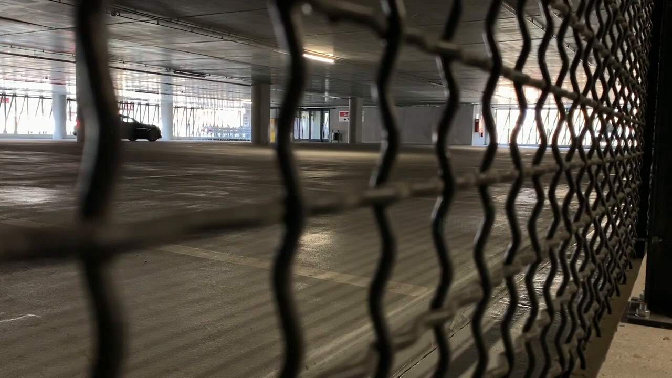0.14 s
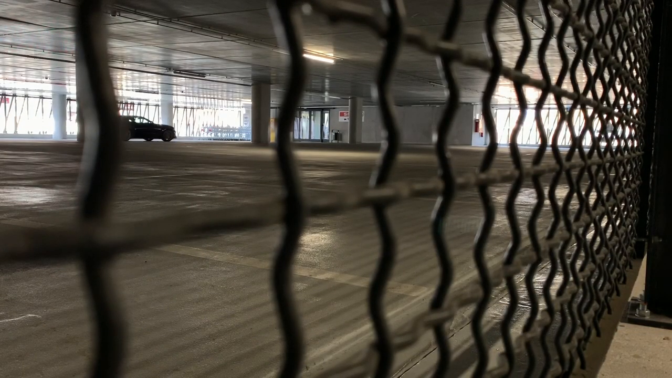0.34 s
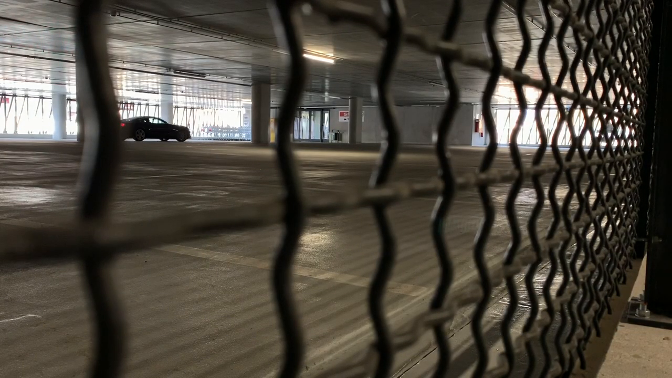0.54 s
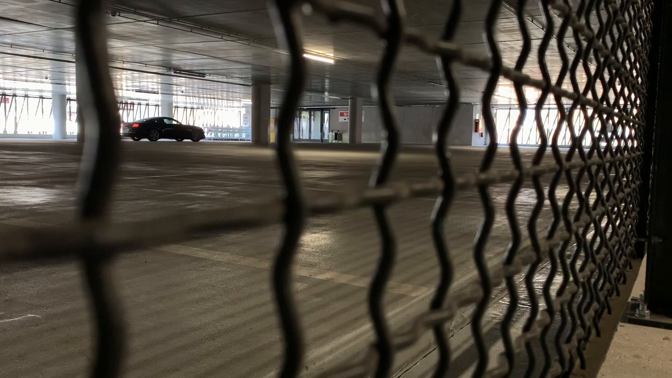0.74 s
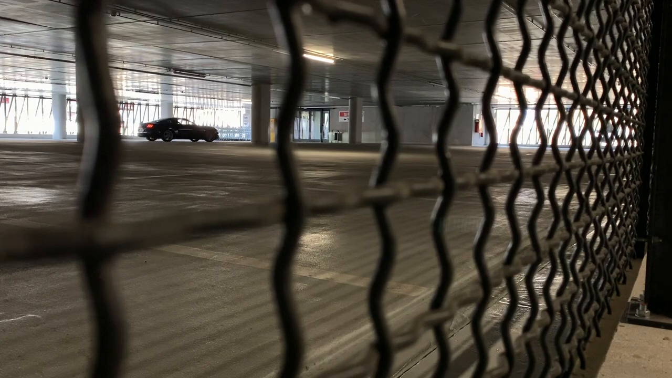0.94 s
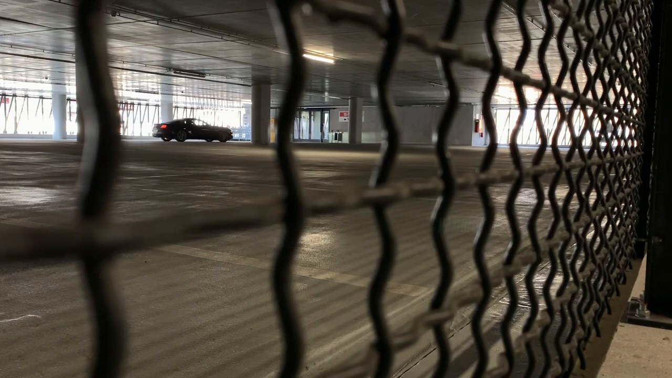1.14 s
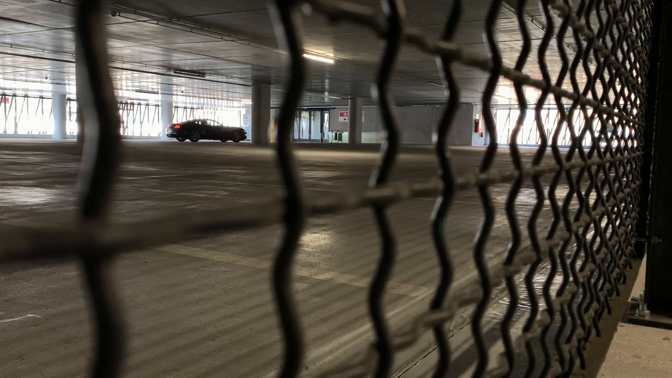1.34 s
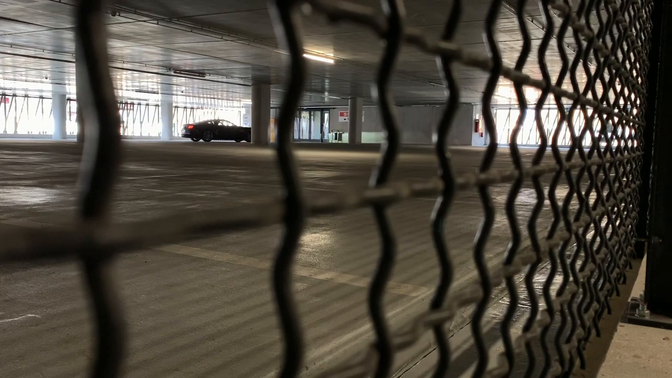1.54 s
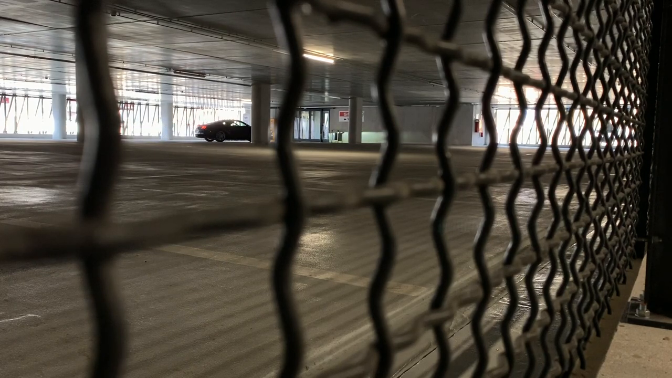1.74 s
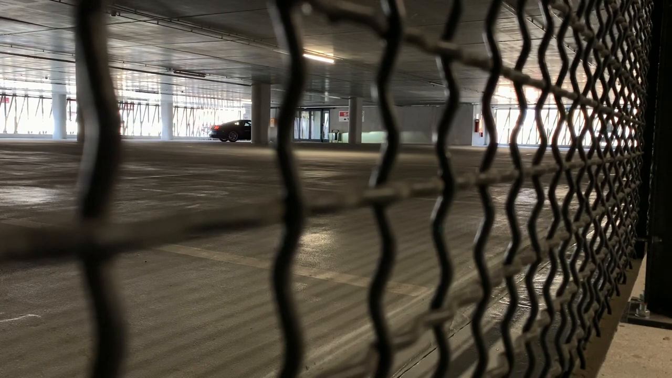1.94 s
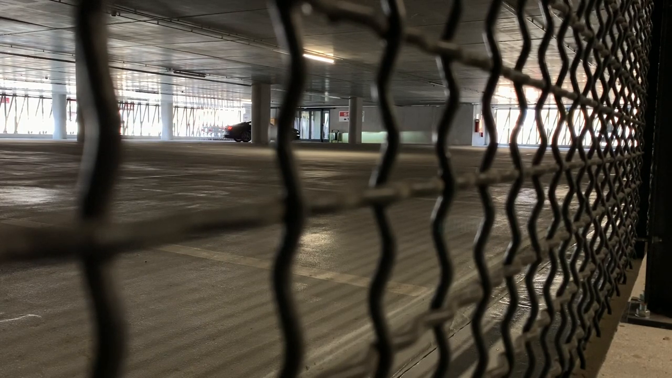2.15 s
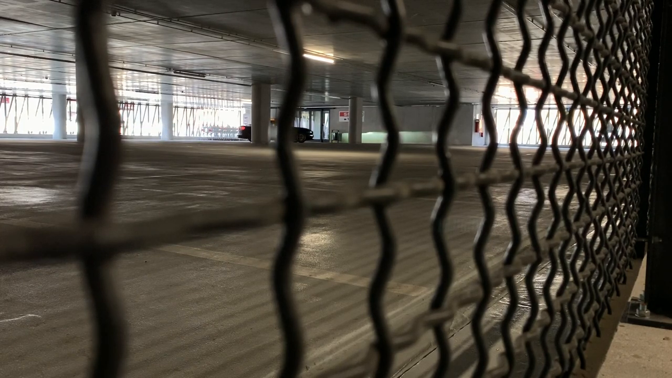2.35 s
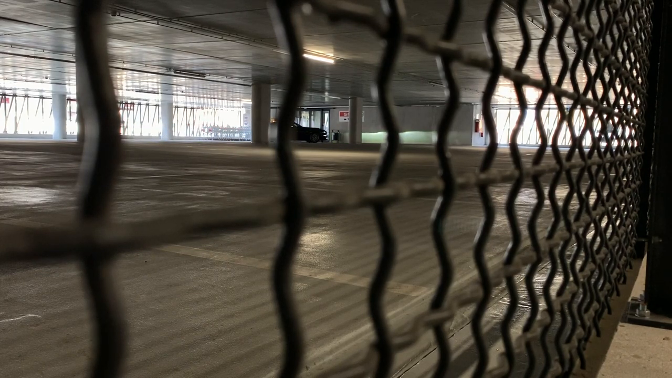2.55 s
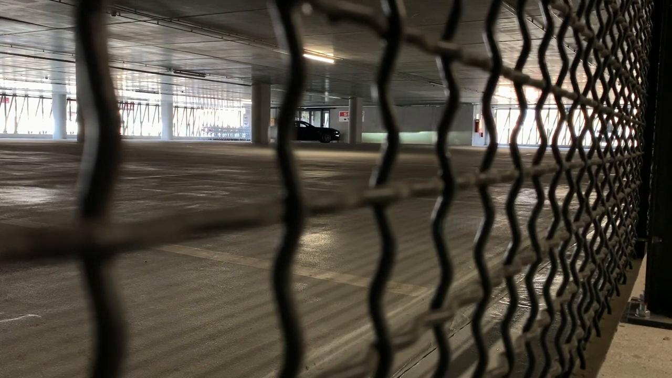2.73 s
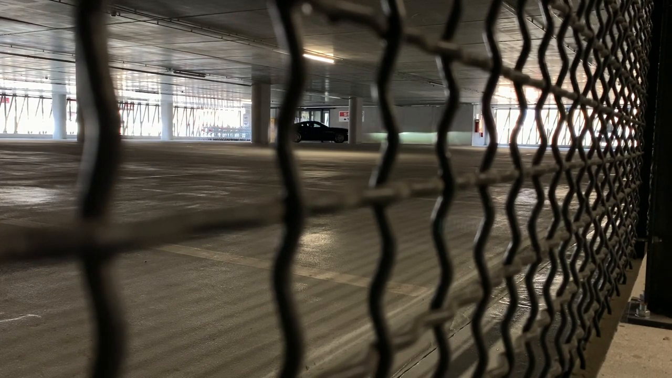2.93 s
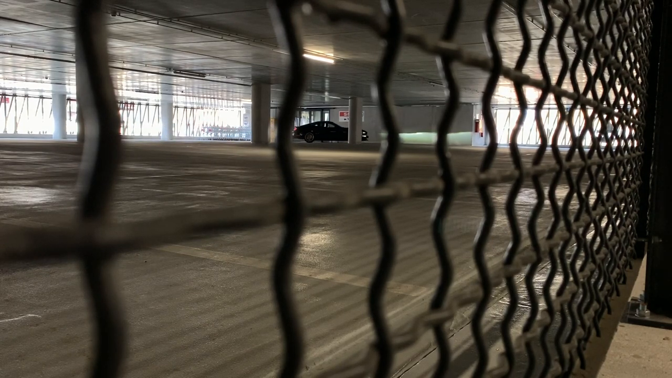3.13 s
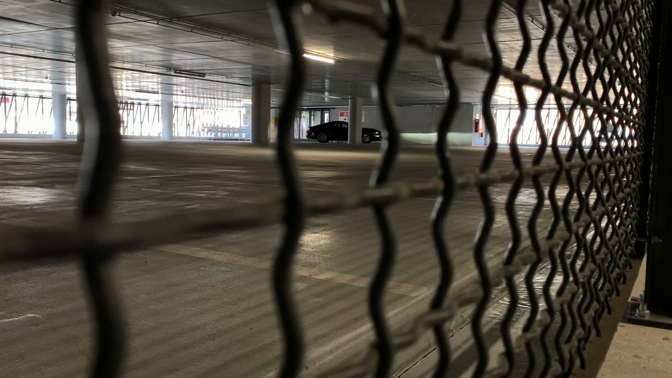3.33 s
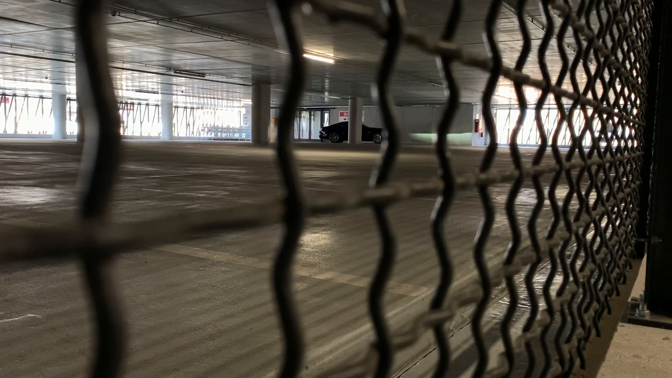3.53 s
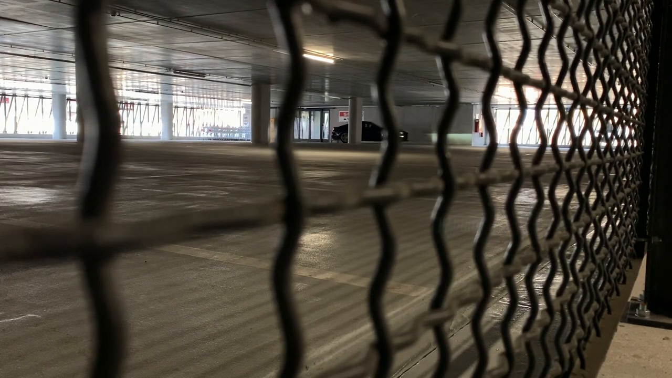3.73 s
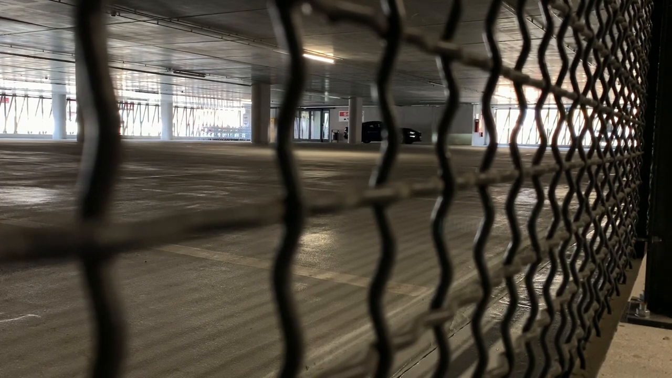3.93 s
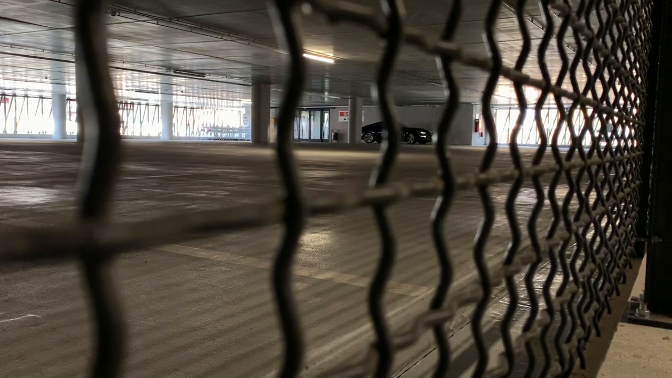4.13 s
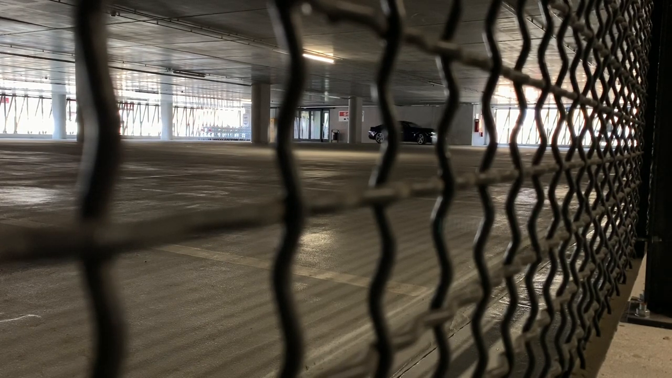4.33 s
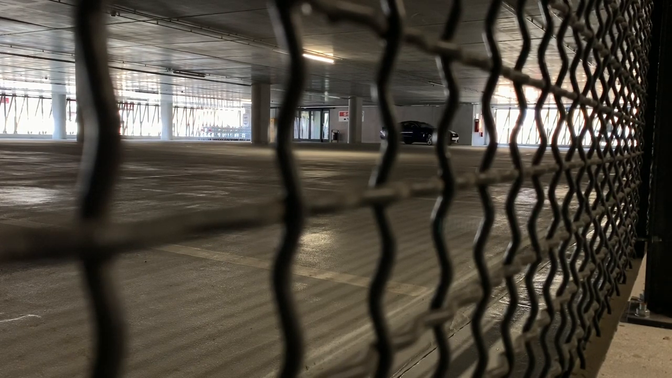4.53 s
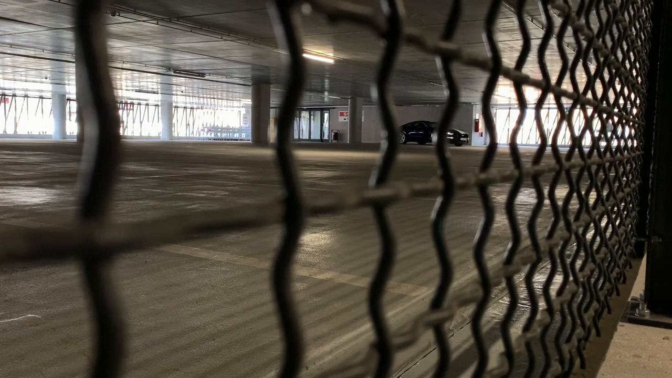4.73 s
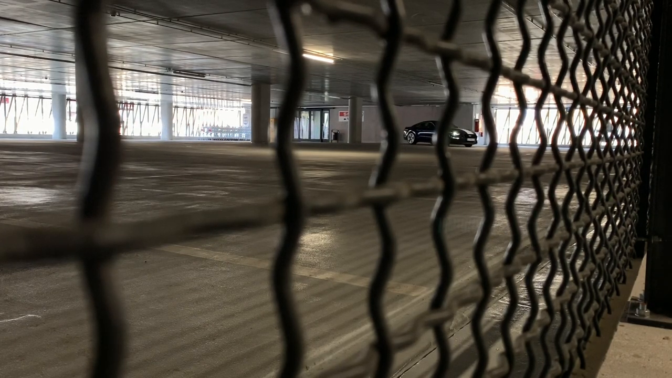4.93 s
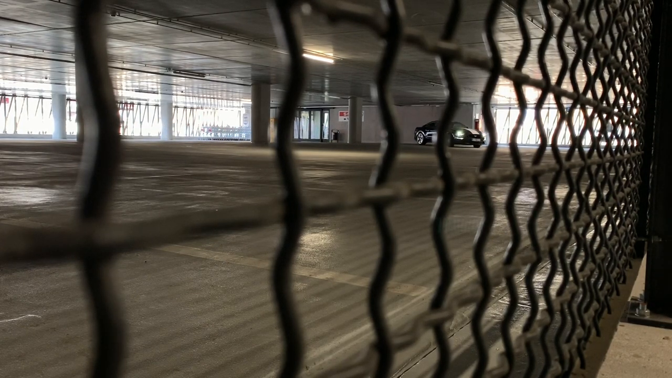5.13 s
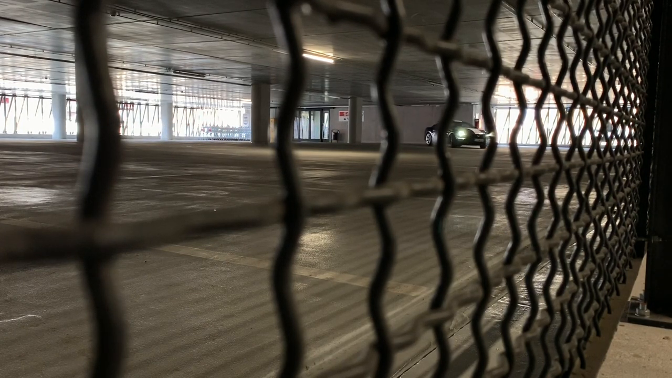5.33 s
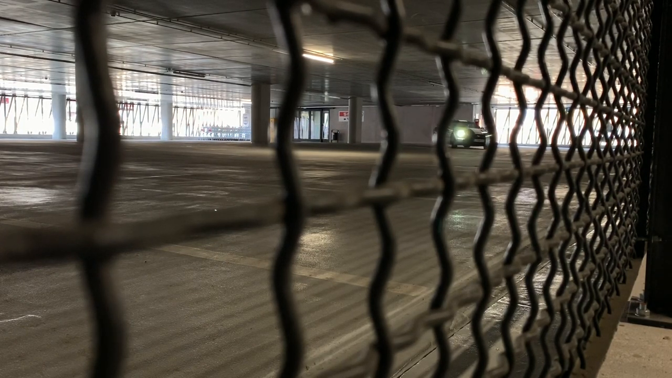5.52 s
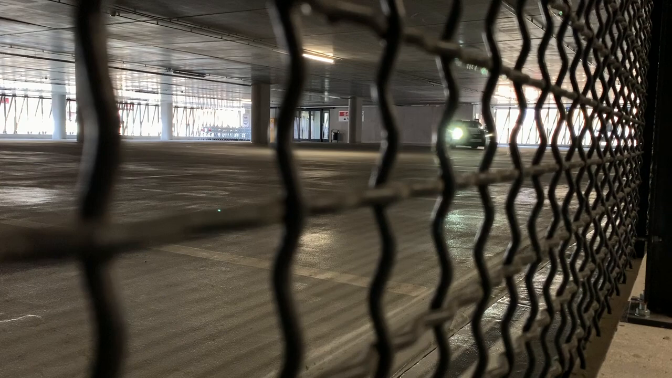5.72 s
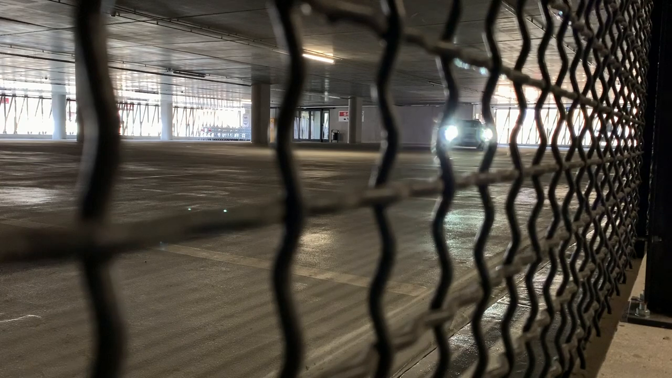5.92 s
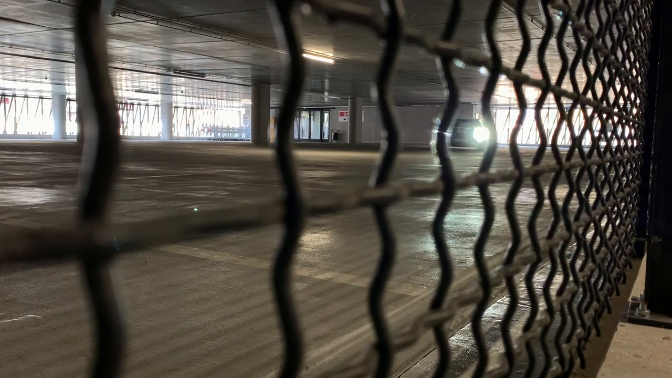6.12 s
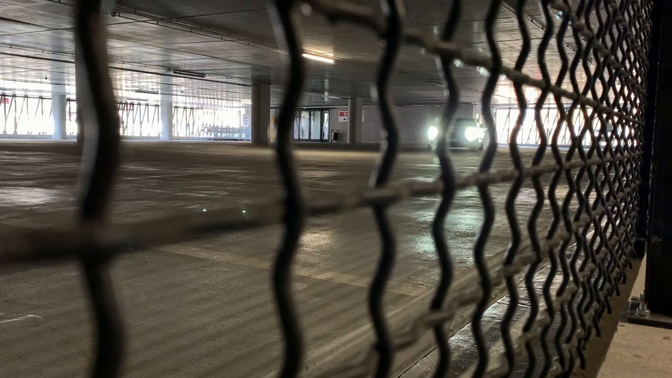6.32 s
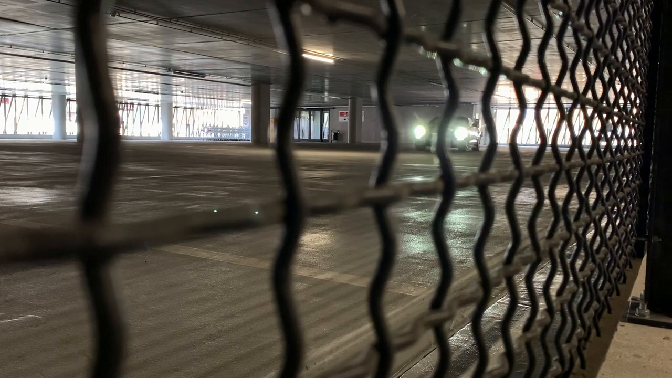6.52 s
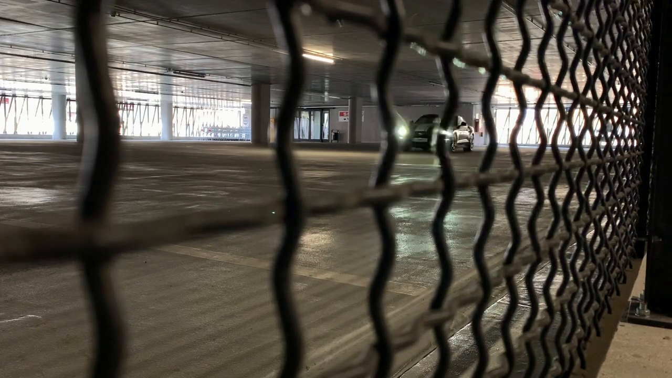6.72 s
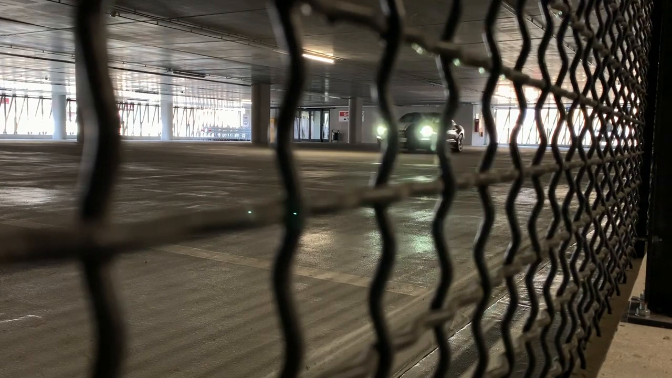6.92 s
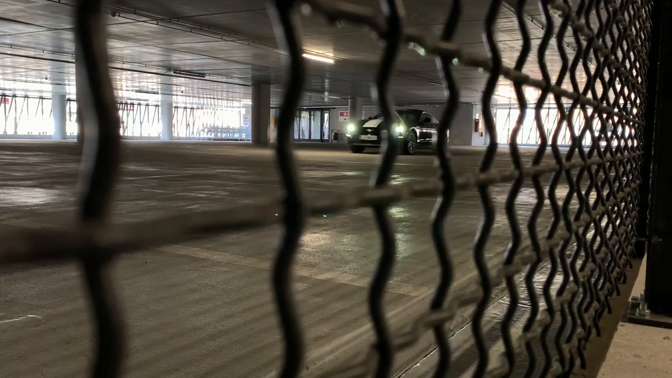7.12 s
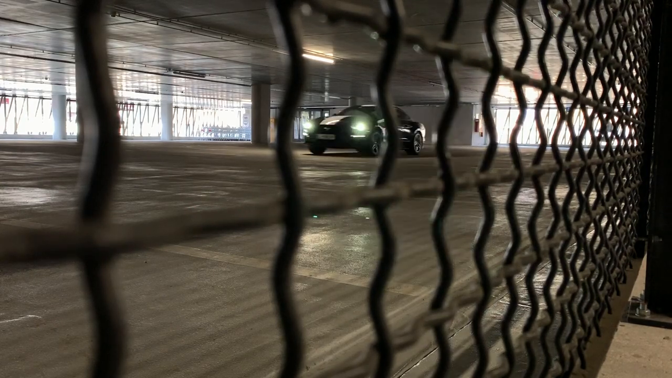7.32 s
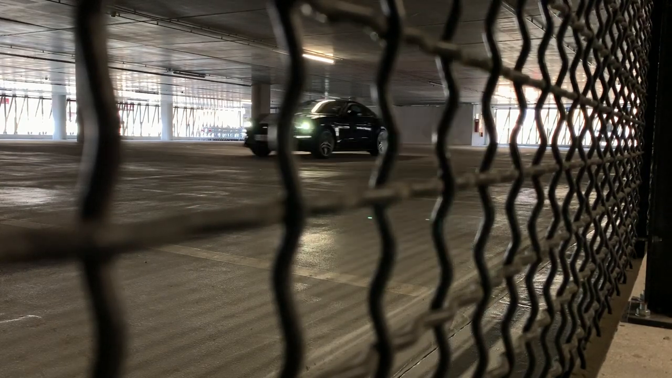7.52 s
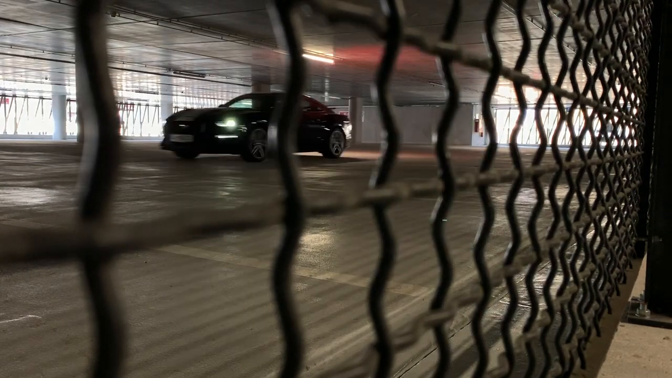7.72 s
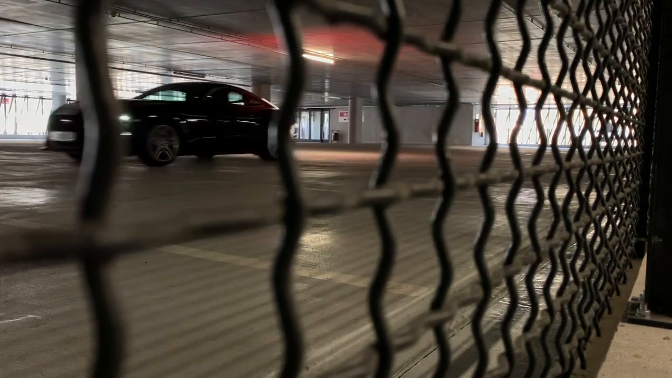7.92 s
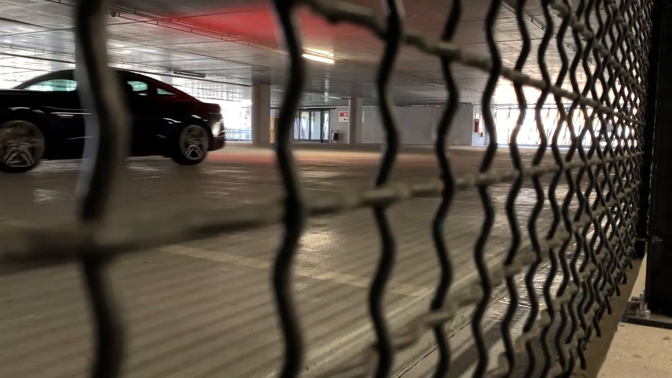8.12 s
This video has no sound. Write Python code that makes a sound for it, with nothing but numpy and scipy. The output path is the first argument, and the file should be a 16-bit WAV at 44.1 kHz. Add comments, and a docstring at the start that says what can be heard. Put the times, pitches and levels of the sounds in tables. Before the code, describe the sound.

Deep, uneven V8 exhaust booms through a parking garage as a car crawls along, turns and revs hard towards the listener.

```python
"""A V8 car crawls across the far end of a concrete parking garage, turns and accelerates towards us.
Uneven exhaust pulses ring the pipes, so they boom, burble and thud; gas rasps out with every firing,
and the bare decks smear it all into a roar. The tyres squeal thinly on the smooth floor as the
throttle first opens, and scrub through the turns. A thin, very high hiss grows as the car nears.
Under it all lies the building's rumble."""
import sys
import numpy as np
from scipy import signal
from scipy.fft import rfft, irfft
from scipy.io import wavfile
from scipy.ndimage import uniform_filter1d, minimum_filter1d

SR = 44100
rng = np.random.default_rng(int(sys.argv[2]) if len(sys.argv) > 2 else 0)


def generate_wav(signal):
    """Clip the signal to [-1, 1] and save it as 16-bit WAV at the path in sys.argv[1]."""
    frames = np.transpose(np.atleast_2d(signal))
    scaled = np.clip(frames, -1, 1) * 32767
    pcm = np.round(scaled).astype(np.int16)
    wavfile.write(sys.argv[1], SR, pcm)


N = 359856
TIME = np.arange(N) / SR
BINS = np.fft.rfftfreq(N, 1 / SR)

# reverb decay of the garage: f/Hz, t60/s
GARAGE_T60 = [(60, 0.8), (250, 2.4), (1000, 2.4), (4000, 2.2), (12000, 0.1)]
# stereo width: f/Hz, left-right correlation
CORRELATION = [(30, 1), (60, .98), (125, .88), (250, .85), (500, .52), (1000, .2), (2000, .17), (4000, .25),
               (6000, .05), (8000, -.3), (10000, -.35), (13000, .55)]
# stereo lean: f/Hz, left minus right/dB
BALANCE = [(60, -.5), (250, -.3), (500, 1), (1000, 1.8), (2000, 1.6), (4000, -.9), (8000, 0)]
# the building's low end (every EQ is a shape only; gain comes after it): f/Hz, level/dB
RUMBLE_EQ = [(12, -6), (22, -2.5), (30, -2.5), (40, 5.5), (52, 17.5), (70, -8.5), (110, -19), (300, -54.5)]

# a thin, very high hiss grows as the car nears: t/s, level/dB
HIGH_HISS_FADER = [(4.6, -82), (5.3, -70), (5.7, -64), (6.0, -56), (6.75, -57), (7.0, -49), (7.4, -48.5),
                   (7.8, -48), (8.16, -47)]
# the EQ that keeps it to about 12-15 kHz: f/Hz, level/dB
HIGH_HISS_EQ = [(9000, -21), (11000, -24), (12000, 6.5), (14000, -0.5), (15500, -4)]
# the tyres scrub through a wide turn, then a tight one: t/s, level/dB
SCRUB_FADER = [(2.1, -55), (2.6, -42.5), (3.05, -49), (3.4, -66), (4.5, -55), (4.85, -38.5), (5.3, -43.5),
               (5.8, -35.5), (6.5, -51), (6.8, -65)]
# where the dragged rubber rings: f/Hz, width/Hz, level/dB
SCRUB_BANDS = [(1370, 135, 1.5), (2180, 260, -1), (2580, 460, -5), (3700, 600, -15)]
# three rising tyre squeals, each a list of: t/s, f/Hz, level before trim/dB
SQUEAL_GLIDES = [
    [(.76, 6050, -72), (.92, 6130, -63), (1.0, 6300, -61), (1.06, 6530, -53), (1.1, 6900, -73),
     (1.18, 7050, -66), (1.26, 7400, -72)],
    [(.95, 5450, -71), (1.03, 5500, -65), (1.09, 5620, -66), (1.15, 5620, -73)],
    [(1.37, 6150, -70), (1.42, 6280, -58), (1.47, 6470, -56), (1.54, 6620, -61), (1.6, 6700, -72)],
]

# idle, a crawl, then a hard pull, at eight firings a cycle: t/s, cycle rate/Hz
CYCLE_RATE = [(0, 12.2), (1.0, 12.5), (1.15, 16.4), (1.7, 16.0), (2.55, 16.8), (3.05, 17), (3.55, 16.1),
              (4.05, 17.4), (4.7, 17.7), (5.3, 20.3), (5.7, 22.5), (6.05, 25.4), (6.35, 27), (6.62, 31.3),
              (6.9, 36.6), (7.15, 42.6), (7.38, 45.4), (7.7, 43.4), (8.16, 44)]
# two dabs of the throttle, then the long push: t/s, load/dB (weighted per layer)
ENGINE_LOAD = [(0, 2.5), (.25, 1.5), (.6, -3), (.98, -2.5), (1.08, 1), (1.16, 10.5), (1.36, 10.5),
               (1.52, 13.5), (1.78, 13), (1.92, 10), (2.7, 2), (3.25, 5), (3.55, 3.5), (3.7, 3.5), (3.8, 8),
               (3.93, 10.5), (4.22, 8), (4.65, 3), (5.25, 9.5), (5.75, 10.5), (6.3, 10), (6.55, 12),
               (7.0, 11), (7.6, 9), (8.16, 3)]
# the car's way towards us: t/s, nearness 0-1, lift/dB (weighted per layer)
CAR_PATH = [(0, 0, 1), (2.1, 0.13, 2), (2.7, 0, 4.5), (3.5, 0, 2.5), (4.7, 0.01, 5), (5.7, 0.05, 6.5),
            (6.55, 0.25, 15), (6.85, 0.1, 14), (7.02, 0.14, 17.5), (7.25, 0.33, 20), (7.5, 0.2, 19.5),
            (7.8, 0.3, 18), (8.16, 0, 15.5)]
# firings are smooth when coasting, rough under load: t/s, raggedness 0-1
RAGGEDNESS = [(0, 0.65), (1.0, 0.52), (1.45, 0.79), (1.9, 0.82), (2.4, 0.34), (3.3, 0.29), (3.9, 0.63),
              (5.2, .4), (6.2, 0.51), (7.0, 0.81), (8.16, 0.8)]
# the eight firings, through pipes of unequal length: level/dB, lag/cycles
FIRING_PATTERN = [(1, 0.00043), (-12.5, .035), (-1, .012), (-9.5, .055), (-5, .02), (-2.5, .046),
                  (-10, 0.0056), (-1, .03)]

# colours from far and near of tyre and air hiss, gas rasp, pipe bark and burble: f/Hz, level/dB
HISS_FAR_EQ = [(3800, -18), (4600, -4.5), (5800, 1), (7400, 4.5), (8600, 4), (10000, -17), (13000, -51),
               (16000, -14.5)]
HISS_NEAR_EQ = [(3800, -14), (4600, 1), (6200, -2), (8000, 0), (9200, -3), (13500, -6.5), (15600, -10)]
RASP_FAR_EQ = [(700, -20), (810, -2), (920, -3), (1080, -3), (1250, -4), (1440, -4), (1700, -7), (2050, -7),
               (2400, -9.5), (2900, -13), (3700, -18.5), (4400, -23), (5000, -24.5)]
RASP_NEAR_EQ = [(700, -18.5), (810, -4), (950, 5), (1100, -1), (1300, -7), (1500, -1.5), (1750, -18.5),
                (2100, -11.5), (2450, 1.5), (2900, -6), (3700, -11.5), (4400, -28.5), (5000, -42)]
BARK_FAR_EQ = [(470, 1.5), (540, -4), (605, 2), (685, 0), (770, -5), (850, -9), (915, -2.5), (980, -9)]
BARK_NEAR_EQ = [(470, -18.5), (555, -21), (620, 3.5), (680, 12.5), (750, 2), (800, -10), (900, -6)]
BURBLE_FAR_EQ = [(130, -17.5), (155, 0.5), (185, -2.5), (220, -2.5), (255, -4.5), (298, -10), (335, -6),
                 (385, -4.5), (430, -15), (490, -32.5), (540, -36)]
BURBLE_NEAR_EQ = [(130, -12), (155, -20), (185, -10.5), (220, 0.5), (255, -4.5), (298, -11.5), (335, -3),
                  (380, 10), (430, 9.5), (490, -6.5), (540, -33.5)]
# low throb of exhaust and garage together: f/Hz, level/dB
THROB_EQ = [(45, -4), (60, -6.5), (80, 1.5), (105, 2.5), (140, 7.5), (160, -17.5)]

# the hall booms as the car crosses its standing waves: t/s, length/s, level/dB, f/Hz
HALL_BOOMS = [(0.65, .5, -32, 62), (1.06, .4, -22, 98), (1.06, .26, -23.5, 133), (1.1, .26, -26, 168),
              (1.5, .25, -25, 368), (1.84, .32, -28, 365), (1.36, .4, -22.5, 75), (1.4, .55, -17.5, 129),
              (1.42, .42, -21, 163), (1.45, .47, -21.5, 99), (1.62, 2.05, -20, 50.6), (1.9, .35, -24, 133),
              (2.38, .52, -23.5, 135), (2.85, .5, -31, 204), (3.05, .4, -27, 152), (3.12, .48, -25, 131),
              (3.7, .26, -28, 50), (3.74, .34, -21.5, 134), (3.95, .4, -30, 325), (4.0, .36, -26, 226),
              (4.05, .3, -23, 140), (4.33, .38, -25, 50.5), (4.45, .36, -25, 141), (4.7, .6, -28, 51.5),
              (4.92, .46, -23.5, 170), (5.08, .44, -22, 101), (5.26, .4, -22, 177), (5.48, .3, -22, 172),
              (5.5, .34, -23, 111), (5.76, .52, -19, 184), (5.92, .34, -25, 358), (5.9, .46, -21.5, 129),
              (6.05, .45, -29, 53), (6.26, .28, -20.5, 138), (6.36, .36, -22, 261), (6.42, .46, -15, 156),
              (6.45, .28, -20, 383), (6.45, .26, -24, 90), (6.6, .52, -13, 183), (6.75, .35, -26, 75),
              (6.9, .34, -21.5, 408), (7.02, .32, -17, 213), (7.08, .42, -17, 135), (7.23, .34, -22, 229),
              (7.38, .34, -21.5, 351), (7.3, .62, -19.5, 87), (7.58, .4, -20.5, 216), (7.6, .32, -24, 370),
              (7.78, .32, -27, 45), (7.92, .4, -23, 226), (7.94, .34, -26, 132)]
# single hard firings that thud out of the burble: t/s, dry peak/dB
THUD_HITS = [(1.181, -23.5), (1.264, -16.5), (1.503, -16), (1.617, -12.5), (1.71, -11), (2.085, -17),
             (2.207, -9.5), (2.325, -22), (2.415, -23.5), (3.123, -12), (3.183, -13.5), (3.244, -22.5),
             (3.318, -12), (3.449, -14.5), (3.922, -5), (4.204, -14.5), (4.432, -13.5), (4.673, -26),
             (5.262, -11), (5.4, -10.5), (5.601, -17), (5.624, -10), (5.723, -13), (5.813, -9.5),
             (6.011, -5.5), (6.408, -7), (6.564, -15.5), (6.76, -5.5), (6.911, -10)]
# the pipe modes they knock: f/Hz, relative level/dB, t60/s
PIPE_MODES = [(133.3, 6, 0.032), (216, -6, 0.025), (346, -2.5, 0.037), (644, -12.5, 0.033)]
# with the tailpipes in the open, firings crack through the roar: t/s, dry level/dB
BLAT_FADER = [(6.75, -60), (6.98, -27), (7.15, -25), (7.25, -21), (7.37, -25), (7.51, -21), (7.7, -27),
              (7.95, -38), (8.16, -60)]
# colour of that crack: f/Hz, level/dB
BLAT_EQ = [(520, 2.5), (680, 5), (1000, 3), (1400, -3), (2000, -3), (2600, -15.5)]

# the clear exhaust tones: multiples of the cycle rate
LOW_ORDERS = (2, 3, 4, 5, 6, 8)
# their mix: level/dB
LOW_ORDER_DB = (-18, -18, -14.5, -3, -8, -4)
# resonances of pipes and hall that they glide through: f/Hz, level/dB
LOW_ORDER_EQ = [(30, -15.5), (51, -2), (63, -1), (75, 4), (82, -6), (98, -6.5), (112, -7.5), (134, -5.5),
                (152, -8.5), (185, 1.5), (215, -1), (260, -13), (370, -10)]
# the upper exhaust notes: multiples of the cycle rate
HIGH_ORDERS = (7, 9, 10, 11, 12, 13, 15, 16, 18)
# the colour that they glide through: f/Hz, level/dB
HIGH_ORDER_EQ = [(130, -16.5), (150, -6.5), (175, 1.5), (205, -6.5), (228, -0.5), (260, -5.5), (298, -13.5),
                 (335, -9.5), (385, -4.5), (430, -6), (490, -10), (550, -23), (670, -3.5), (790, -18)]


def gain_of(db):
    """Decibels to amplitude."""
    return 10 ** (np.asarray(db) / 20)


def unit_rms(x):
    """Scales to rms 1."""
    return x / np.sqrt(np.mean(x ** 2) + 1e-20)


def levelled(x, seconds):
    """Rides the gain to hold a running rms of 1."""
    window = np.hanning(max(int(seconds * SR), 9))
    energy = signal.fftconvolve((x ** 2).mean(0), window, "same")
    power = energy / signal.fftconvolve(np.ones(N), window, "same")
    return x / np.sqrt(abs(power) + 1e-20)


def value_at(points, hz):
    """A spectrum's value at hz, on a log-frequency axis."""
    f, value = np.transpose(points)
    return np.interp(np.log(hz + 1), np.log(f + 1), value)


def curves(rows):
    """One automation curve for each value column of a time table."""
    times, *columns = np.transpose(rows)
    return [np.interp(TIME, times, column) for column in columns]


def wander(hz, step=8):
    """Random drift of rms 1, up to about hz."""
    coarse = TIME[::step]
    spectrum = rfft(rng.standard_normal(len(coarse)))
    lowpass = np.exp(-(BINS[:len(spectrum)] / hz) ** 2)
    return np.interp(TIME, coarse, unit_rms(irfft(spectrum * lowpass, len(coarse))))


def equalised(x, eq):
    """Applies an EQ that falls away steeply past its ends; comes out at rms 1."""
    outside = np.maximum(np.maximum(eq[0][0] / (BINS + 1), BINS / eq[-1][0]), 1)
    return unit_rms(irfft(rfft(x) * gain_of(value_at(eq, BINS)) / outside ** 8, N))


def distance_eq(x, far, near):
    """Crossfades from the far colour towards the near one with nearness, at a running rms of 1."""
    nearness = curves(CAR_PATH)[0]
    return levelled((1 - nearness) * equalised(x, far) + nearness * equalised(x, near), seconds=0.96)


def fader(idle_db, per_load, per_approach):
    """A layer's gain: its level at a far idle, lifted by engine load and by the approach."""
    return gain_of(idle_db + per_load * curves(ENGINE_LOAD)[0] + per_approach * curves(CAR_PATH)[1])


def stereo(mid_side):
    """Turns mid and side into left and right; bass arrives alike at both ears."""
    mid, side = rfft(mid_side)
    alike = value_at(CORRELATION, BINS)
    mid, side = mid * np.sqrt(1 + alike), side * np.sqrt(1 - alike)
    lean = gain_of(value_at(BALANCE, BINS) / 2)
    return irfft(np.array([(mid + side) * lean, (mid - side) / lean]), N)


def garage(x, direct, places=12):
    """A long concrete reverb, with a new echo pattern at each place that the car passes."""
    hz, t = np.fft.rfftfreq(512, 1 / SR)[:, None], np.arange(0, 1.5, 256 / SR)
    noise = rng.standard_normal((places, 2, len(hz), 2 * len(t))).view(complex)
    tails = signal.istft(noise * gain_of(-60 * t / value_at(GARAGE_T60, hz)), SR, nperseg=512)[1]
    running = np.pad(x, (SR, 0), "reflect")  # the hall is already ringing
    place = np.linspace(0, places - 1, N + SR)
    wet = np.zeros((2, N + SR + tails.shape[-1]))
    for k, tail in enumerate(tails):
        here = np.flatnonzero(abs(place - k) < 1)
        send = running[here] * np.cos(np.pi / 2 * (place[here] - k))
        echo = signal.fftconvolve(send[None], tail, axes=1)
        wet[:, here[0]:here[0] + echo.shape[1]] += echo
    centre = direct * unit_rms(x) * np.array([[1], [0]])
    return stereo(unit_rms(wet[:, SR:SR + N]) + centre)


def with_reverb(x, wet, places):
    """Adds the garage's reverb at wet times the dry rms."""
    return x + wet * np.std(x) * unit_rms(garage(x, direct=0, places=places))


def building_rumble(level_db=-31.5):
    """The bed: the deep, steady rumble of the building."""
    return gain_of(level_db) * equalised(rng.standard_normal(N), RUMBLE_EQ)


def high_hiss():
    """A thin, very high hiss at about 12-15 kHz that grows as the car nears."""
    hiss = equalised(stereo(rng.standard_normal((2, N))), HIGH_HISS_EQ)
    return gain_of(curves(HIGH_HISS_FADER)[0]) * hiss


def tyre_scrub(chatter_db=1.3, chatter_hz=9.0):
    """Rubber dragged sideways rings in broad bands, each flaring as the tread grips and slips."""
    rings = np.zeros((2, N))
    for hz, width, db in SCRUB_BANDS:
        flare = gain_of(db + chatter_db * wander(chatter_hz))
        noise = rfft(rng.standard_normal((2, N)))
        rings += flare * irfft(noise / (1 + (2 * (BINS - hz) / width) ** 2), N)
    return gain_of(curves(SCRUB_FADER)[0]) * unit_rms(stereo(rings))


def tyre_squeal(glide, waver_hz=45, chatter_db=2.5, scratch_hz=260, scratch_db=-3, trim_db=-0.5):
    """A thin tone climbs, chatters and scratches as the rubber slips on smooth concrete."""
    hz, db = curves(glide)
    gate = uniform_filter1d(1. * (TIME > glide[0][0]) * (TIME < glide[-1][0]), size=600)
    phase = 2 * np.pi * np.cumsum(hz + waver_hz * wander(180)) / SR
    scratch = wander(scratch_hz) * np.sin(phase) + wander(scratch_hz) * np.cos(phase)
    ring = np.sin(phase) + gain_of(scratch_db) * scratch
    return gate * gain_of(db + trim_db + chatter_db * wander(60)) * ring


def standing_waves(flutter_db=1.36, spread_per_hz=0.0015, pitch_pull=0.26, sharpness=1.1):
    """Each hall boom swells and dies, bending a little with the revs; higher ones sit wider."""
    rate, out = curves(CYCLE_RATE)[0], np.zeros((2, N))
    flutter = gain_of(flutter_db * wander(27))
    for start, length, db, hz in HALL_BOOMS:
        offset, side = rng.uniform(-1, 1, 2)
        on = (TIME > start) & (TIME < start + length)
        pitch = hz * (rate[on] / rate[on].mean()) ** pitch_pull
        spread = spread_per_hz * hz * side * np.array([[1], [-1]])
        phase = np.pi * (2 * np.cumsum(pitch) / SR + offset) + spread
        swell = abs(np.sin(np.pi * (TIME[on] - start) / length)) ** sharpness
        out[:, on] += np.sqrt(2) * gain_of(db) * swell * flutter[on] * np.cos(phase)
    return out


def firings(cycles, uneven_db=9.5, jitter_cycles=.016):
    """One pressure pulse for each firing; ragged ones stray in strength and timing."""
    number = np.floor(cycles * len(FIRING_PATTERN)).astype(int)
    at = np.flatnonzero(np.diff(number))
    db, lag = np.array(FIRING_PATTERN)[number[at] % len(FIRING_PATTERN)].T
    strength, late = np.clip(rng.standard_normal((len(at), 2)), -2, 2).T * curves(RAGGEDNESS)[0][at]
    onsets = at + np.round((lag + late * jitter_cycles) / np.diff(cycles)[at]).astype(int)
    pulses = np.bincount(abs(onsets), gain_of(db + uneven_db * strength), N)[:N]
    return pulses - uniform_filter1d(pulses, size=4001)


def gas_puffs(pulses, puff_s=0.0014, leak=0.047):
    """Each pulse tears out a short puff of turbulence over a steady flow."""
    puffs = signal.lfilter([1], [1, -np.exp(-1 / (puff_s * SR))], np.maximum(pulses, 0))
    return unit_rms((unit_rms(puffs) + leak) * rng.standard_normal(N))


def dulled_at_idle(x, shelf_hz=1960, idle_loss=0.6, idle_rate_hz=9.6, bright_rate_hz=20):
    """Near idle the gas flows slowly, so its rasp loses some top end."""
    idling = np.interp(curves(CYCLE_RATE)[0], [idle_rate_hz, bright_rate_hz], [1, 0])
    treble = irfft(rfft(x) * (1 - np.exp(-(BINS / shelf_hz) ** 2)), N)
    return x - idle_loss * idling * treble


def rasp_and_hiss(pulses, crack=0.53, direct_far=0.2, direct_near=0.75, surge_db=2.2):
    """Gas rasps with each firing, sharper and surging up close, over the hiss of tyres and air."""
    nearness = curves(CAR_PATH)[0]
    direct = direct_far + (direct_near - direct_far) * nearness
    jets = np.maximum(pulses, 0) ** 0.6  # compressed, so the rasp swells smoothly
    hall = garage(gas_puffs(jets) + crack * unit_rms(jets), direct)
    rasp = dulled_at_idle(distance_eq(hall, RASP_FAR_EQ, RASP_NEAR_EQ))
    hiss = distance_eq(stereo(rng.standard_normal((2, N))), HISS_FAR_EQ, HISS_NEAR_EQ)
    surges = gain_of(surge_db * nearness * wander(35))
    return (fader(idle_db=-38.5, per_load=0.11, per_approach=0.88) * surges * rasp
            + fader(idle_db=-60.5, per_load=0.16, per_approach=1.124) * hiss)


def tailpipe_blat(pulses, grit=0.8):
    """The hard crack of each firing as the car swings past, and its echo."""
    crack = equalised(unit_rms(pulses) + grit * gas_puffs(pulses), BLAT_EQ)
    blat = gain_of(curves(BLAT_FADER)[0]) * levelled(crack[None], seconds=0.08)[0]
    return with_reverb(blat, wet=0.9, places=2)


def pipe_thuds(rise_s=0.0078, detune=0.048):
    """A hard firing knocks the pipes, a little differently each time, and the hall answers."""
    t, out = np.arange(SR // 8) / SR, np.zeros(N + SR)
    attack = np.minimum(t / rise_s, 1) ** 2
    for hit_s, peak_db in THUD_HITS:
        tunings = 1 + detune * rng.uniform(-1, 1, len(PIPE_MODES))
        ring = attack * sum(gain_of(db - 60 * t / t60) * np.sin(2 * np.pi * hz * tuning * (t - rise_s))
                            for (hz, db, t60), tuning in zip(PIPE_MODES, tunings))
        at = round((hit_s - rise_s) * SR)
        out[at:at + len(t)] += gain_of(peak_db) * ring / abs(ring).max()
    return with_reverb(out[:N], wet=1.0, places=8)


def order_tone(cycles, order, sway_rad, flutter_db):
    """One exhaust tone; echoes sway its phase at each ear and its level, by these amounts per order."""
    stray = sway_rad * (wander(7.9) + wander(4.0) * np.array([[1], [-1]]))
    phase = order * (2 * np.pi * cycles + stray) + 2 * np.pi * rng.random()
    return np.sqrt(2) * gain_of(flutter_db * order * wander(7.0)) * np.cos(phase)


def exhaust_notes(cycles):
    """The upper exhaust orders climb with the revs, each swelling and fading on its own."""
    rate = curves(CYCLE_RATE)[0]
    tones = sum(gain_of(value_at(HIGH_ORDER_EQ, order * rate))
                * order_tone(cycles, order, sway_rad=0.03, flutter_db=0.3) for order in HIGH_ORDERS)
    return fader(idle_db=-42.0, per_load=0.8, per_approach=0.63) * tones


def exhaust_boom(cycles):
    """The clear low tones follow the load and swell in the resonances of pipes and hall."""
    rate = curves(CYCLE_RATE)[0]
    tones = sum(gain_of(db + value_at(LOW_ORDER_EQ, order * rate))
                * order_tone(cycles, order, sway_rad=0.022, flutter_db=0.6)
                for order, db in zip(LOW_ORDERS, LOW_ORDER_DB))
    return fader(idle_db=-30.5, per_load=0.56, per_approach=0.52) * tones


def notch_low_orders(x, cycles):
    """Tracking notches leave only what lies between the clear exhaust tones."""
    window = signal.windows.hann(SR // 5)[None]
    for order in LOW_ORDERS:
        carrier = np.exp(2j * np.pi * order * cycles)
        envelope = signal.oaconvolve(x / carrier, window / window.sum(), "same", axes=1)
        x = x - 2 * (carrier * envelope).real
    return x


def exhaust_roar(pulses, cycles, grit=0.81, direct_far=0.45, direct_near=0.99, bark_above_db=10):
    """Pulses ring the pipes: a low throb, a burble, and a bark that opens under heavy load."""
    drive = unit_rms(pulses) + grit * curves(RAGGEDNESS)[0] * gas_puffs(pulses)
    direct = direct_far + (direct_near - direct_far) * curves(CAR_PATH)[0]
    hall = notch_low_orders(garage(drive, direct), cycles)
    throb = levelled(equalised(hall, THROB_EQ), seconds=0.78)
    burble = distance_eq(hall, BURBLE_FAR_EQ, BURBLE_NEAR_EQ)
    bark = distance_eq(hall, BARK_FAR_EQ, BARK_NEAR_EQ)
    opening = gain_of(2 * np.maximum(curves(ENGINE_LOAD)[0] - bark_above_db, 0))
    return (fader(idle_db=-32.0, per_load=0.7, per_approach=0.27) * throb
            + fader(idle_db=-34.0, per_load=0.88, per_approach=0.55) * burble
            + fader(idle_db=-41.5, per_load=0.19, per_approach=1.09) * bark * opening)


def scene():
    """The mix: the V8 in front, over the building and the tyres."""
    cycles = np.cumsum(curves(CYCLE_RATE)[0]) / SR
    pulses = firings(cycles)
    engine = exhaust_boom(cycles) + exhaust_notes(cycles) + exhaust_roar(pulses, cycles)
    texture = rasp_and_hiss(pulses) + tailpipe_blat(pulses) + standing_waves() + pipe_thuds()
    bed = building_rumble()
    squeals = with_reverb(sum(tyre_squeal(glide) for glide in SQUEAL_GLIDES), wet=0.73, places=2)
    return engine + texture + bed + squeals + tyre_scrub() + high_hiss()


def record(dry, ceiling=1.0, high_cut_hz=15600):
    """The master: a fast limiter on the loudest peaks, tiny fades at the ends, a steep high cut."""
    peak_gain = np.minimum(1, ceiling / (abs(dry).max(0) + 1e-9))
    limited = dry * uniform_filter1d(minimum_filter1d(peak_gain, size=301), size=301)
    faded = limited * signal.windows.tukey(N, .001)
    high_cut = signal.firwin(511, high_cut_hz, window=("kaiser", 9), fs=SR)
    return signal.oaconvolve(faded, high_cut[None], "same")


dry = scene()
out = record(dry)
generate_wav(out)
```